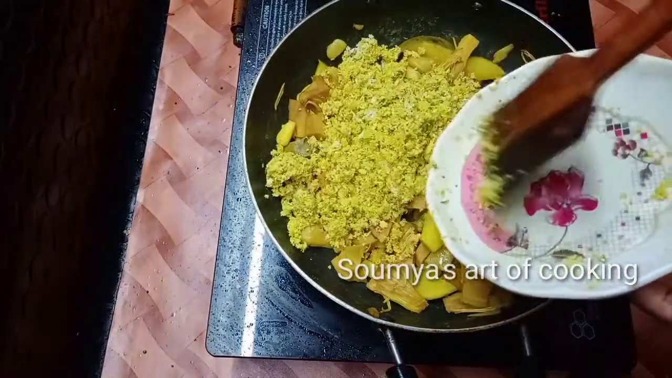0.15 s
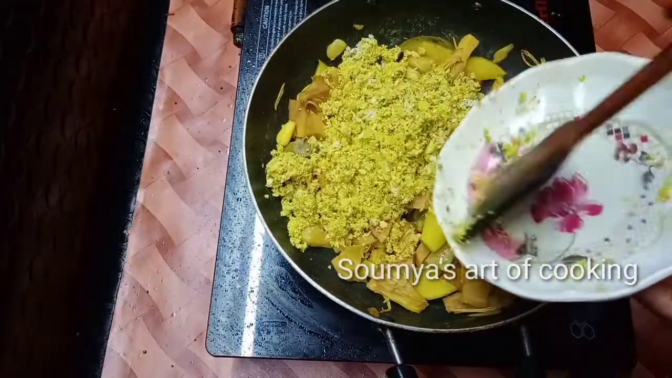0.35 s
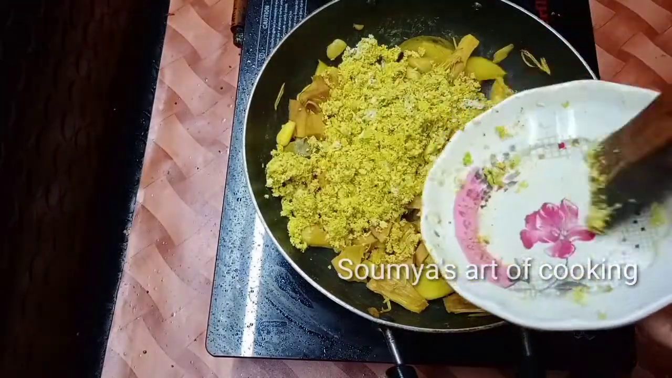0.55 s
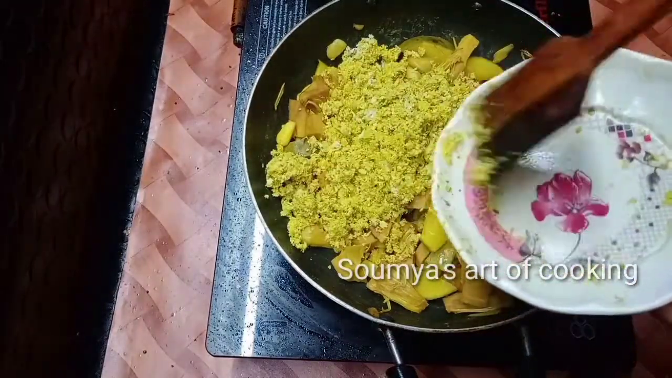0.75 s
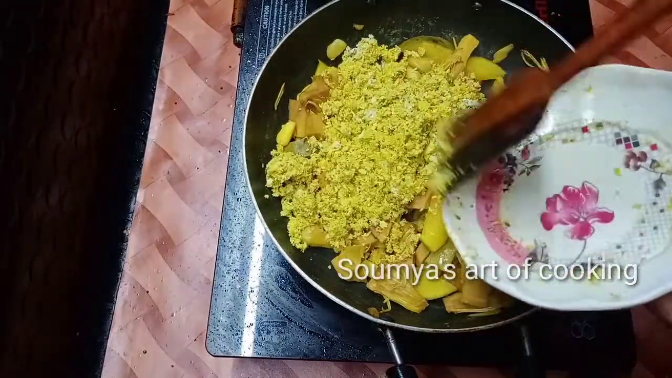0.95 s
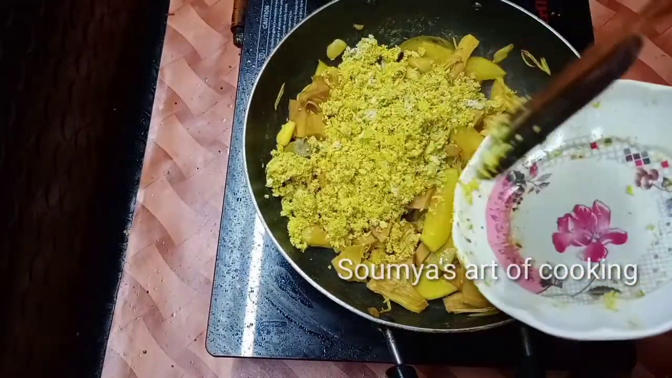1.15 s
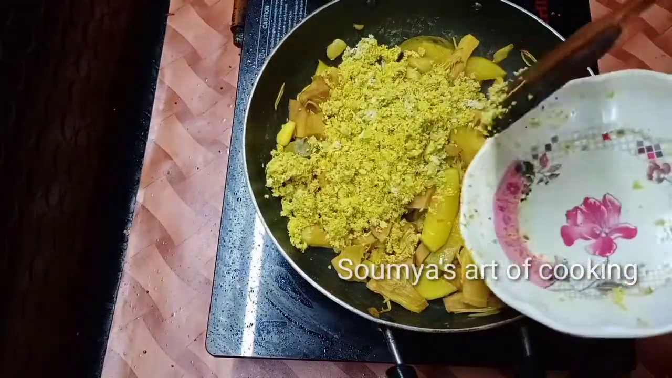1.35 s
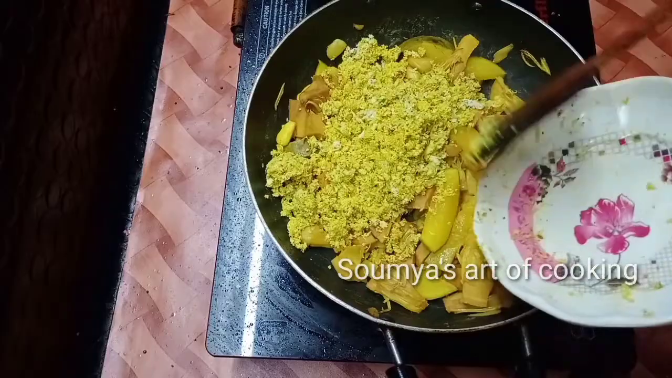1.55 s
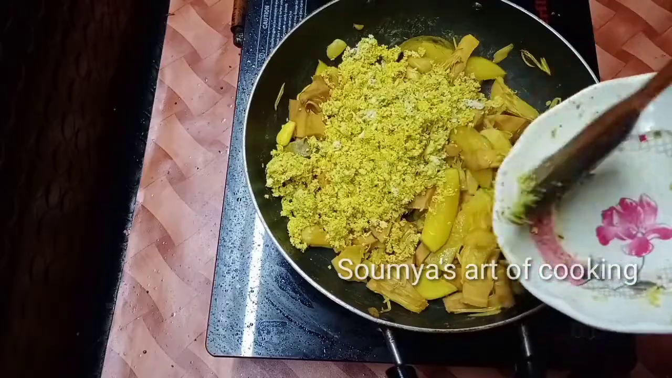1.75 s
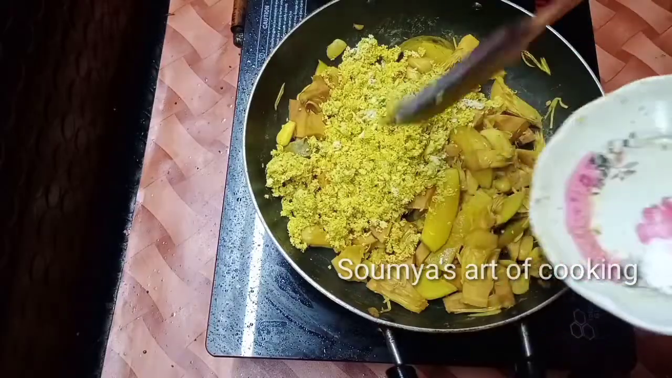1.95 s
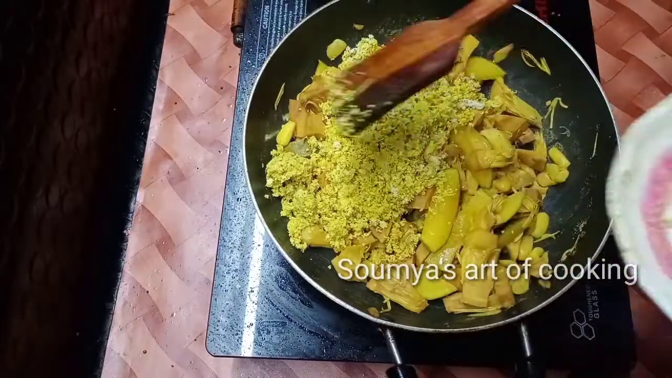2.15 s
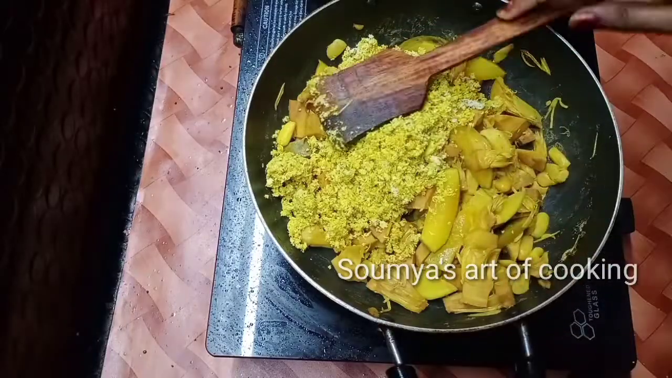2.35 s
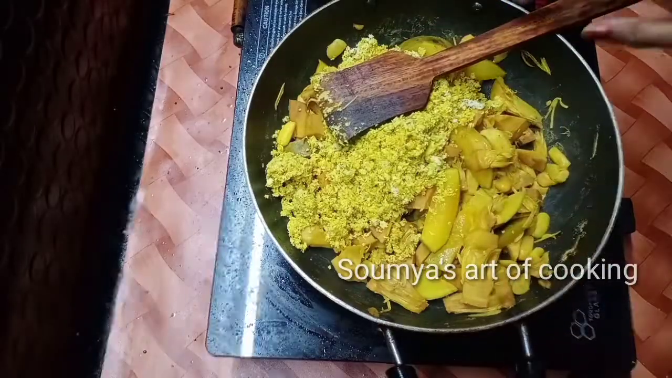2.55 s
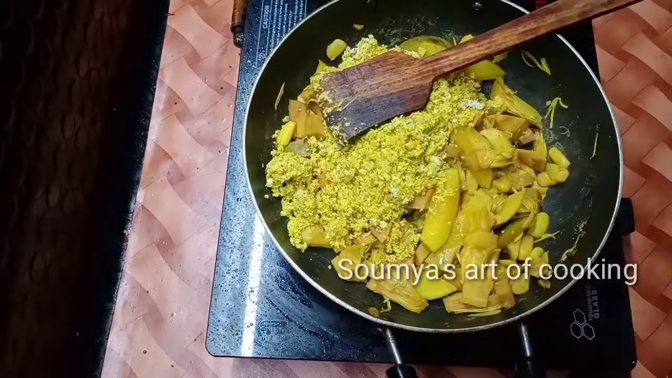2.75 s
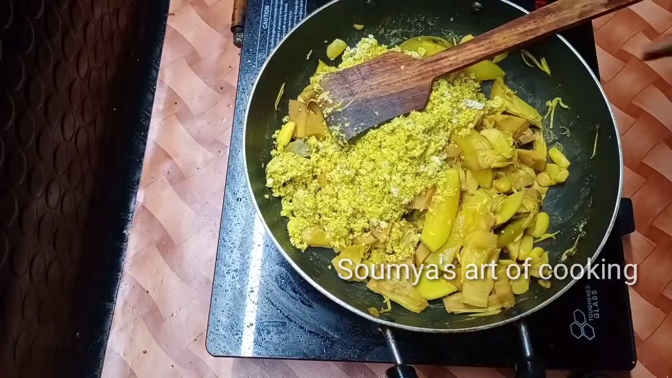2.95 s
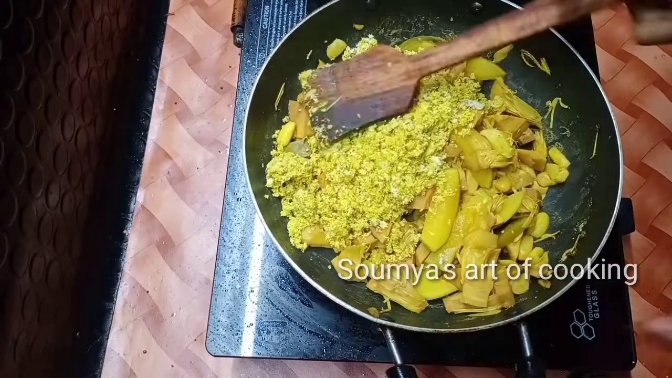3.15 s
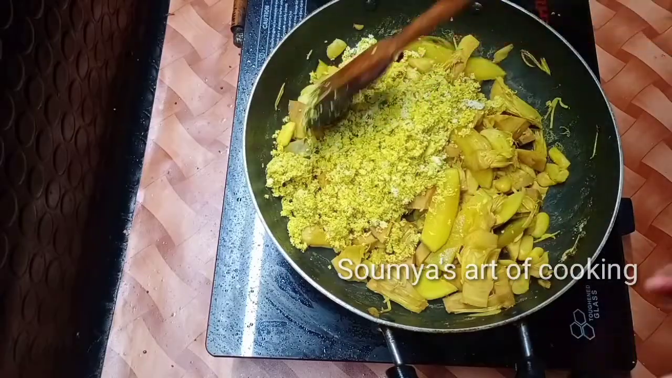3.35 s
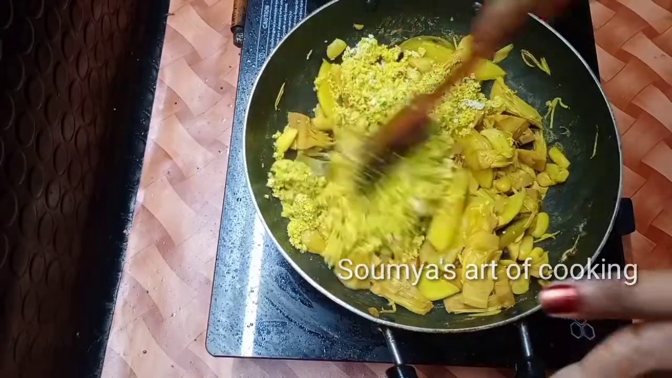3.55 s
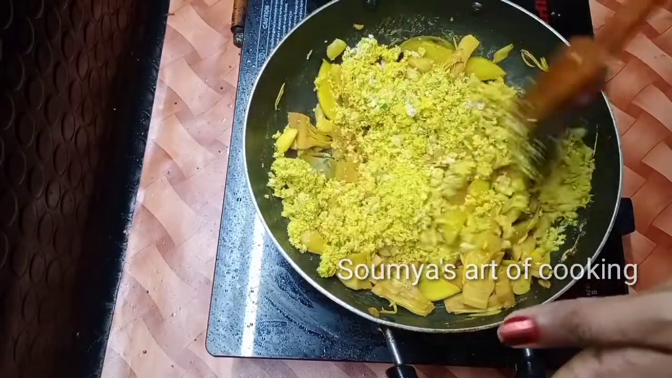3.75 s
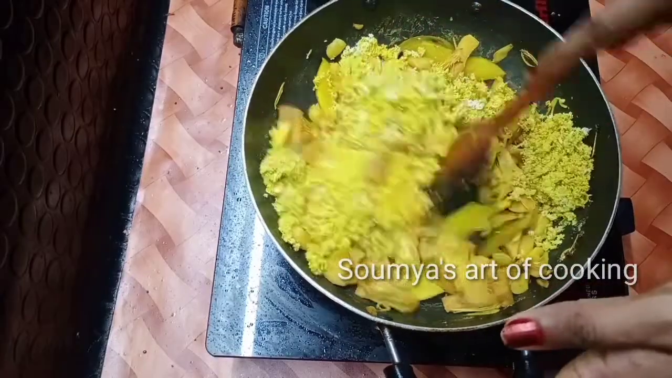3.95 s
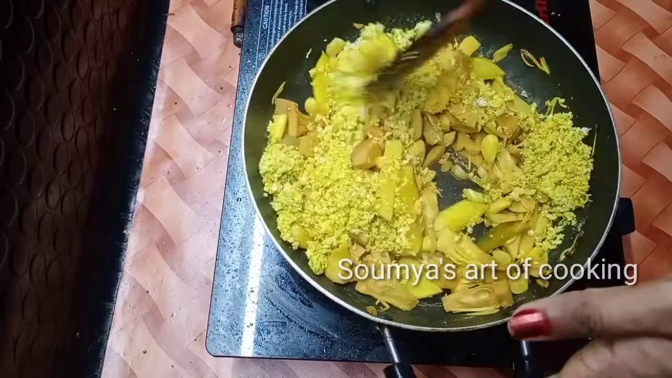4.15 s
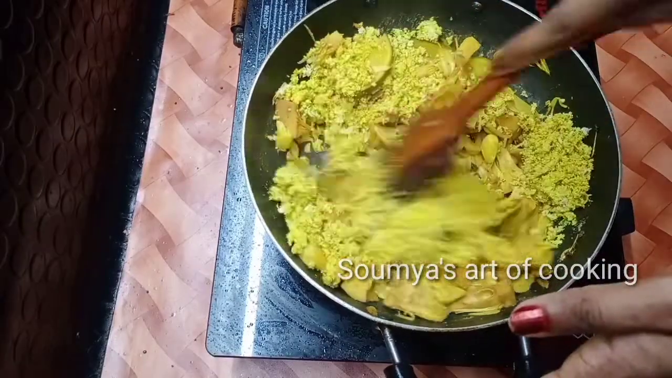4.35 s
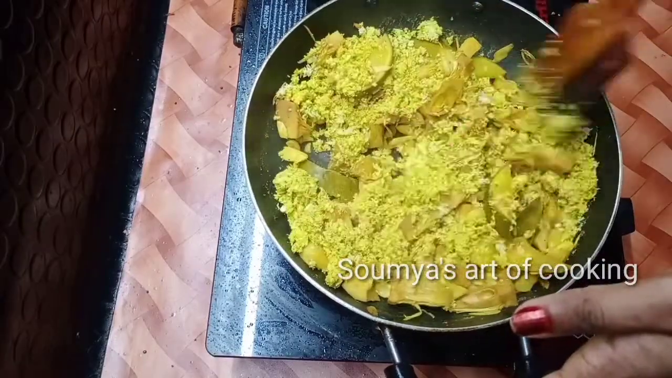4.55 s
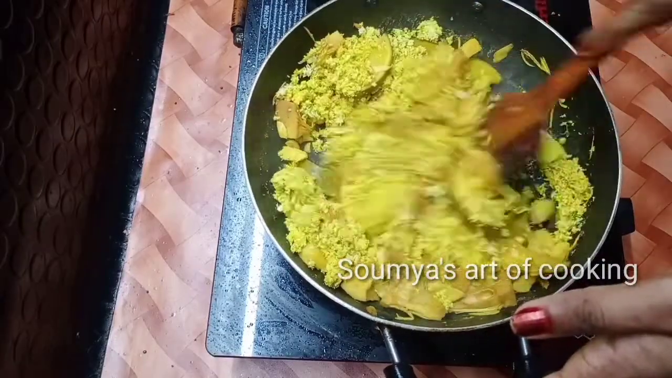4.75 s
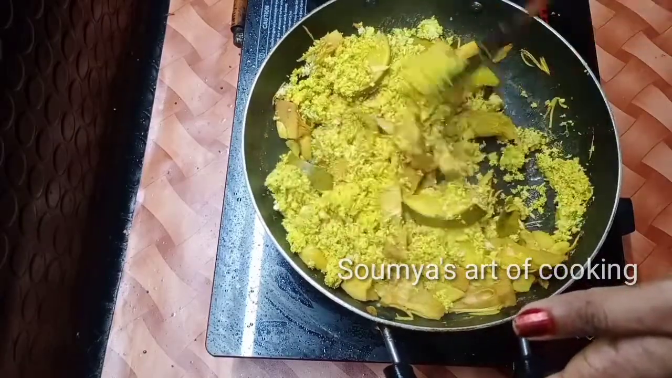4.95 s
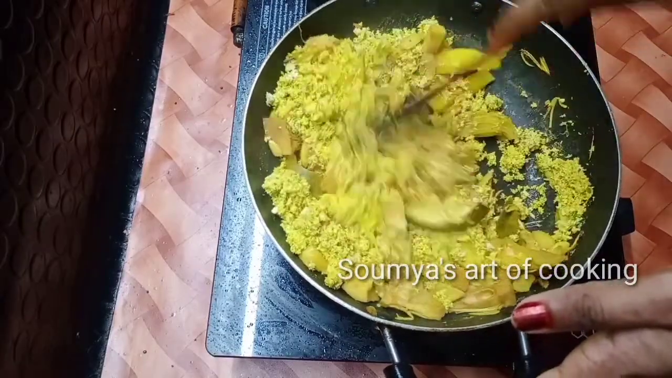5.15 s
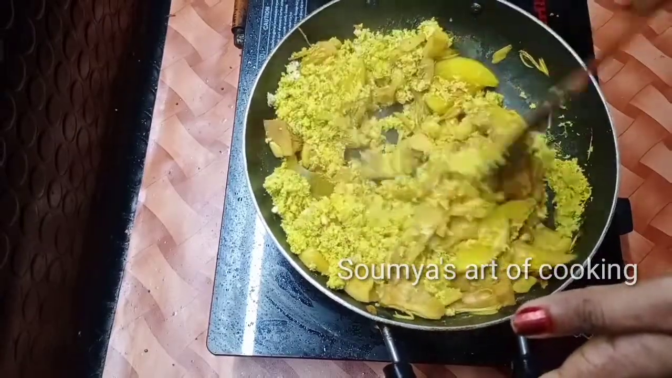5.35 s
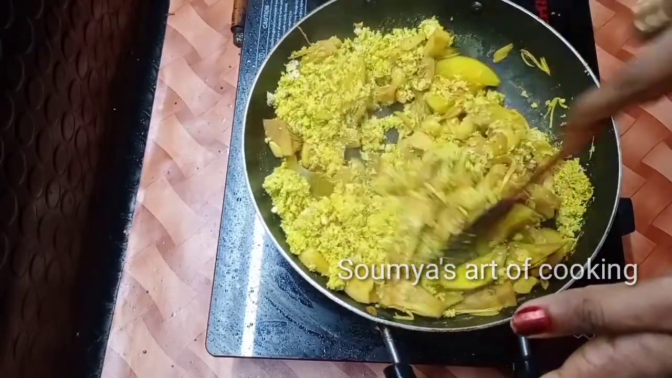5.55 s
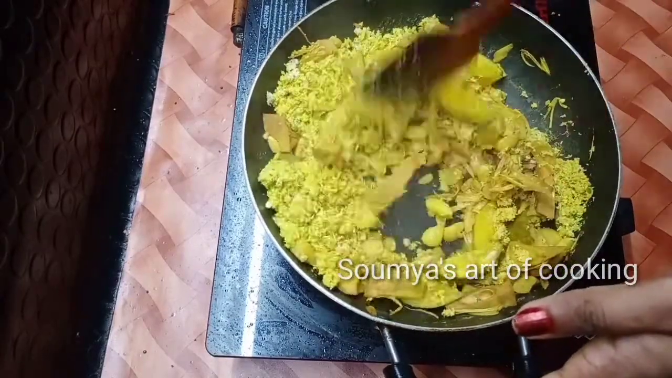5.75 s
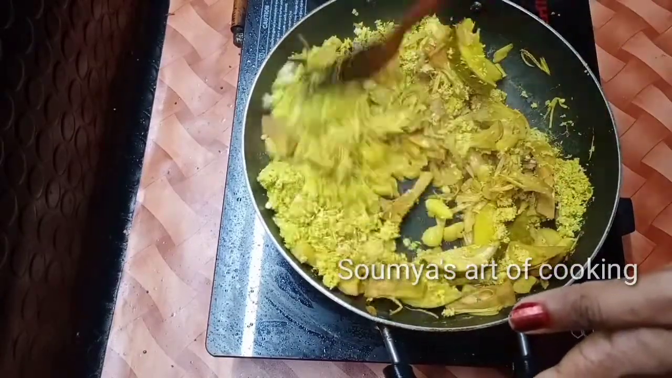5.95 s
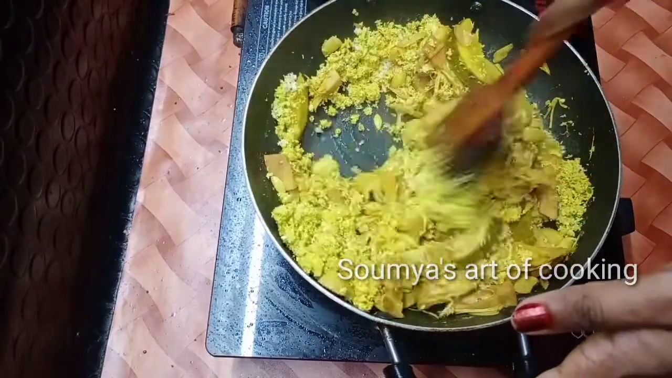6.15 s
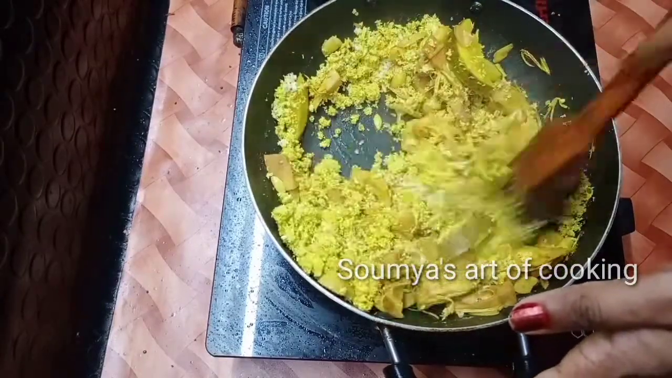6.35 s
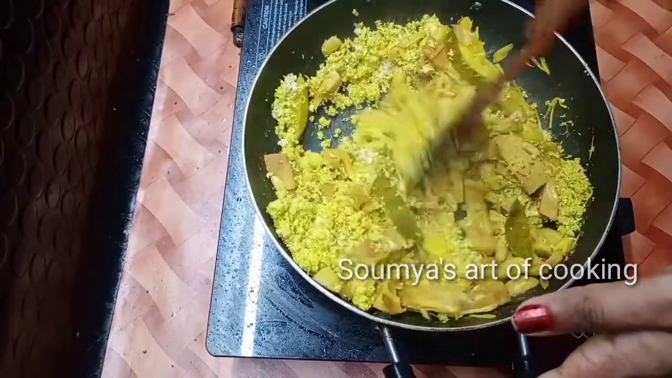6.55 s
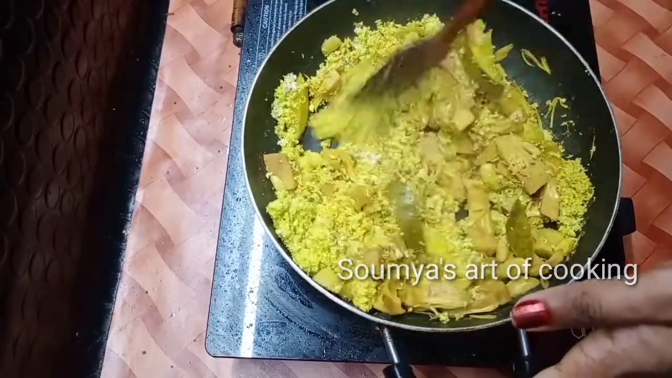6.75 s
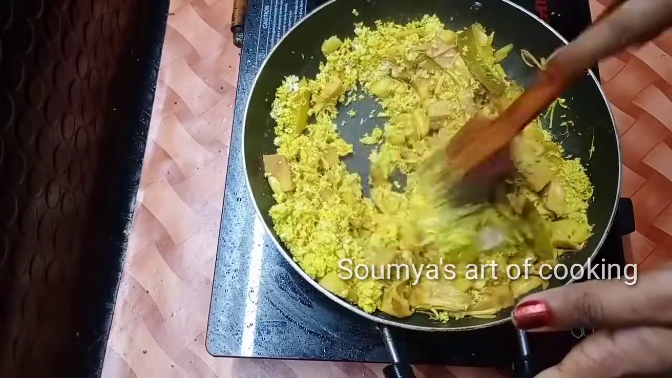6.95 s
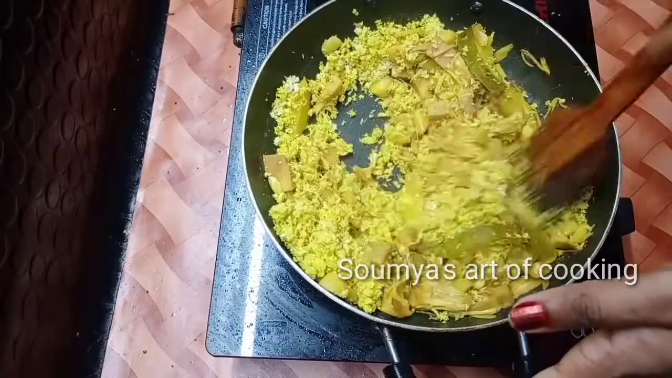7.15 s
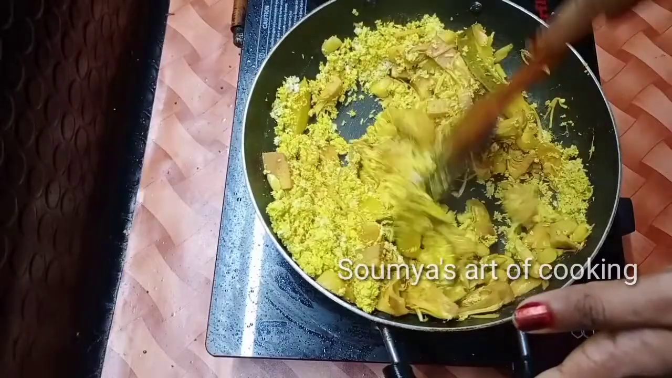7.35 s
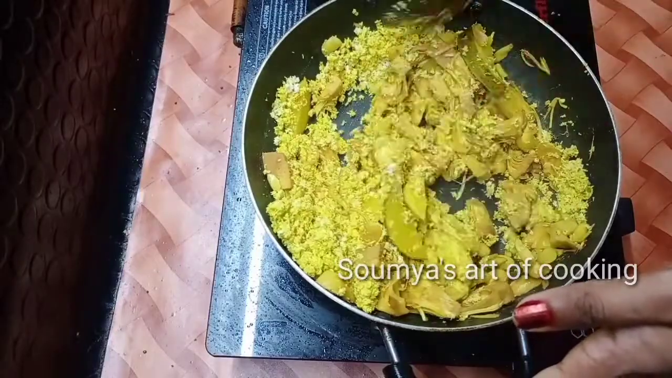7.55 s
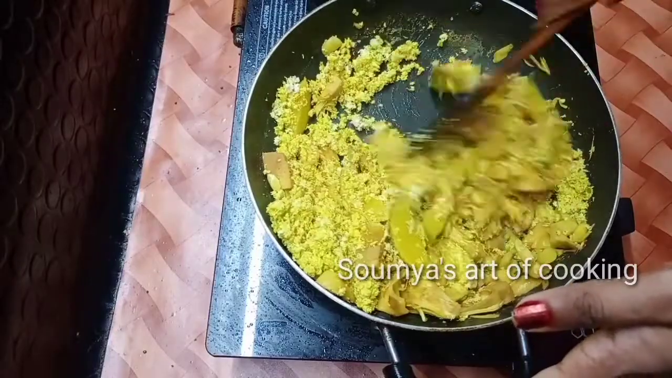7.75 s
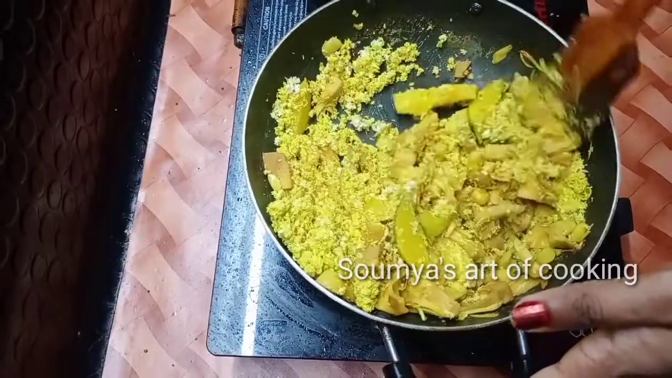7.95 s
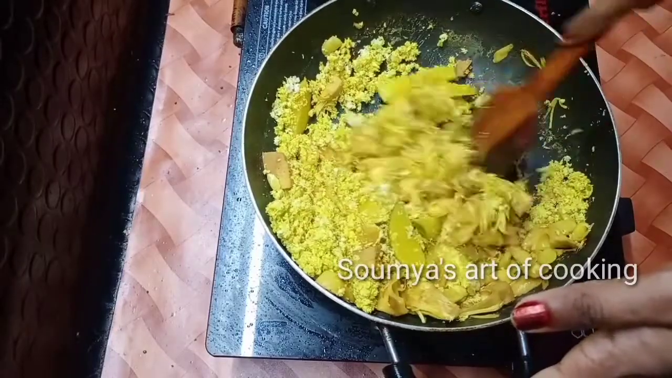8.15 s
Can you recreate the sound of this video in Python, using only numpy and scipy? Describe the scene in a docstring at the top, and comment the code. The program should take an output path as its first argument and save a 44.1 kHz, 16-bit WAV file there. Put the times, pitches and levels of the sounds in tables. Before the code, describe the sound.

Food sizzles in a pan throughout, a fine, bright hiss with wet crackle, over the very faint hum of a cooker fan. From the start until about 1.9 seconds, a wooden spatula knocks on a plate in a quick, uneven run, each hit a woody clack with a short ring, with brief scrapes near 0.4, 1 and 1.4 seconds. Two softer knocks at about 2.6 seconds mark the plate being put down. From 3 seconds the spatula works in the pan, with irregular ticks, thuds and short gritty scrapes that set the pan ringing dully. The strongest knocks land near 4, 4.7 and 5.7 seconds. The sizzle flares briefly with the strokes and sinks somewhat after 6 seconds, while lighter knocks and scrapes continue to about 8 seconds. Everything sounds close, with the short echo of a small kitchen.

```python
"""Woody knocks and scrapes on a plate over a steady sizzle, then stirring in a ringing pan.
A wooden spatula pushes food off the plate into the pan: each blow is a thud, a knock and a bright tick
that set plate or pan ringing, with the echo of a small kitchen. Tiny bursts of steam make the sizzle;
the cooker's fan hums faintly. Two close microphones share the sound unevenly; a limiter holds the peaks."""
import sys
import numpy as np
from scipy import signal
from scipy.fft import rfft, irfft, next_fast_len
from scipy.io import wavfile

SR = 44100
rng = np.random.default_rng(int(sys.argv[2]) if len(sys.argv) > 2 else 0)


def int16_out(signal):
    """Quantize to a 16-bit WAV file."""
    q = np.round(np.clip(np.atleast_2d(signal).T, -1, 1) * 32767)
    wavfile.write(sys.argv[1], SR, q.astype(np.int16))


N = 361279
FFT_SIZE = next_fast_len(N + SR // 2)
HZ = np.maximum(np.arange(FFT_SIZE // 2 + 1) * SR / FFT_SIZE, 1)
TIME = np.arange(N) / SR

# Spatula hits on the plate; the last two are the plate being put down. Each row: start in seconds,
# knock level in dB, its pitch in Hz, its t60 in seconds, thud level in dB, its pitch in Hz,
# then tick, snap and shudder in dB. Levels are relative within a column.
PLATE_HITS = [(0.055, -14, 748, 0.061, -40.5, 393, -27.5, -34.5, -34),
              (0.108, -17.5, 654, 0.0084, -21, 431, -29.5, -28, -37),
              (0.161, -37, 676, 0.044, -48, 425, -31, -31.5, -64.5),
              (0.348, -11.5, 1295, 0.086, -26, 187, -42, -39.5, -32),
              (0.451, -12, 1100, 0.022, -31, 417, -23.5, -35, -30),
              (0.662, -7.5, 810, 0.014, -14.5, 433, -14, -22, -28),
              (0.713, -16.5, 670, 0.008, -19.5, 490, -29.5, -40.5, -34.5),
              (0.741, -15, 677, 0.022, -21, 428.4, -25.5, -26.5, -35),
              (0.758, -37, 710, .022, -28.5, 427, -37, -43, -63.5),
              (0.972, -10.5, 748, 0.12, -31, 431, -26, -44.5, -27),
              (1.015, -13, 690, 0.012, -17.5, 495, -21, -35.5, -26.5),
              (1.367, -6.5, 1066, 0.013, -20, 437.4, -14, -21, -28.5),
              (1.619, -10, 680, 0.0092, -19.5, 495, -26, -29, -27.5),
              (1.886, -3, 1015, 0.0061, -15.5, 495, -18.5, -42.5, -29.5),
              (2.578, -25.5, 1900, 0.049, -28, 314.2, -31.5, -46.5, -44.5),
              (2.682, -33, 1540, 0.035, -25, 121.6, -26, -28, -52.5)]
# Spatula hits on the pan, with the same columns.
PAN_HITS = [(3.054, -25.5, 676, .048, -20.5, 210, -13.5, -14, -54.5),
            (3.099, -51, 651, .017, -82, 403, -36.5, -31.5, -68),
            (3.484, -42.5, 958, 0.051, -37, 204, -28.5, -24, -44),
            (3.534, -34.5, 1620, 0.012, -37.5, 480, -33.5, -36, -45.5),
            (3.564, -33.5, 995, 0.026, -32, 125, -17, -8.5, -47.5),
            (3.686, -59, 1440, 0.026, -37, 124, -43.5, -33, -62.5),
            (4.003, -26.5, 980, 0.016, -37, 187, -40.5, -46, -22),
            (4.027, -10.5, 1553, .016, -17.5, 285, -19, -33, -22.5),
            (4.716, -16.5, 1187, 0.02, -27.5, 403, -17.5, -8.5, -15),
            (4.826, -19.5, 603, .0058, -25.5, 125, -43.5, -51, -26.5),
            (4.852, -15, 1520, 0.015, -17, 414, -31.5, -35.5, -27),
            (5.662, -10, 1510, 0.047, -10, 516, -33.5, -29.5, -12),
            (5.677, -13, 1016, 0.027, -6.5, 369, -20.5, -22.5, -25.5),
            (6.04, -22, 773, 0.031, -13.5, 400, -55, -30.5, -22.5),
            (6.576, -18.5, 1550, 0.011, -18.5, 437, -39, -49, -27.5),
            (6.87, -18, 947, 0.042, -16.5, 473, -47.5, -31, -19),
            (7.273, -33, 1466, 0.058, -31.5, 500, -63, -32.5, -35),
            (7.394, -27.5, 1486, .027, -22.5, 445, -54.5, -40.5, -29),
            (7.674, -63, 700, 0.017, -29.5, 456, -55.5, -47, -41.5),
            (8.131, -28, 1520, 0.049, -36.5, 137.5, -38.5, -34, -29.5)]
# Short, quickly dying resonances of blade, plate and pan.
# Each row: pitch in Hz, relative level in dB, t60 in seconds.
BLADE_TONES = [(2340, -7, 0.0037), (2712, -9.5, 0.024), (3100, -18, 0.0069), (3782, 6.5, 0.0031),
               (4330, -2, 0.019), (4900, -9, 0.022), (5670, -14, 0.042)]
PLATE_TONES = [(130, -16.5, 0.048), (210, -15.5, 0.02), (296, -6, 0.025), (431, 2.5, 0.017),
               (497.5, -3, 0.05), (676, -1, 0.037), (748, -9, 0.085), (830, -6.5, 0.013),
               (1090.4, 2, 0.038), (1180, 1.5, 0.027), (1300, 7.5, 0.0088), (1510, 4.5, 0.017),
               (2370, -14, 0.056), (3880, -32, .02)]
PAN_TONES = [(123, -11.5, 0.1), (158, -21, 0.42), (210, -14.5, 0.02), (294.5, -6, 0.089), (352, -10, 0.25),
             (438.7, -3.5, 0.15), (495, -9, 0.046), (595, -12, 0.025), (697, -17.5, 0.049),
             (792, -13.5, 0.056), (895, -11.5, 0.016), (1023, -13, 0.029), (1131, -16.5, 0.03),
             (1520, -16.5, 0.026), (2580, -19.5, 0.017), (3870, -22.5, 0.0052)]
# The blade dragging over plate and pan. Each row: moment of full force, rise, hold and fall in seconds,
# then drag and grit as relative levels in dB.
PLATE_SCRAPES = [(0.382, 0.029, 0.015, 0.33, -39.5, -49), (1.035, 0.0045, 0.01, 0.031, -40, -51.5),
                 (1.44, 0.067, 0.024, 0.071, -34.5, -51.5)]
PAN_SCRAPES = [(3.688, .1, 0.0075, .045, -60, -46), (4.022, 0.031, 0.0037, 0.0052, -22, -39),
               (4.42, 0.074, 0.12, 0.017, -74, -49.5), (4.76, .015, 0.12, .006, -40.5, -45.5),
               (5.657, 0.0047, 0.0025, 0.0027, -15.5, -39), (5.948, 0.036, 0.0028, .03, -48, -73.5),
               (6.49, 0.014, 0.096, .006, -39.5, -49.5), (7.272, 0.011, .005, 0.08, -37, -50),
               (7.72, 0.042, 0.037, 0.096, -33.5, -60), (8.138, 0.018, .005, 0.084, -36, -52)]
# The frying bed. Each row: time in seconds, hiss level in dB, wet crackle level in dB.
FRYING_LEVELS = [(0.0, -46.5, -52), (0.09, -48.5, -56), (2.07, -47, -54), (2.64, -45.5, -50.5),
                 (3.9, -46, -51.5), (4.2, -45.5, -54), (4.58, -47, -53), (6.52, -52.5, -62.5),
                 (6.91, -51, -63), (7.71, -51, -64), (7.87, -56.5, -67.5), (8.19, -55.5, -69)]
# Fresh food meets hot metal and the frying flares.
# Each row: moment of full lift, rise, hold and fall in seconds, then lift of the hiss in dB.
FRYING_FLARES = [(0.11, 0.039, 0.034, 0.13, 3.5), (0.47, 0.029, 0.052, 0.09, 1.5),
                 (1.698, 0.068, .05, 0.077, 1), (2.904, 0.22, 0.04, .2, 1),
                 (4.798, 0.084, 0.075, 0.22, 1.5), (5.295, 0.16, 0.033, 0.15, 2.5),
                 (5.688, 0.049, 0.04, 0.21, 3.5), (6.06, .04, 0.096, 0.45, 3), (6.495, 0.059, .08, 0.18, 2),
                 (6.873, .04, 0.047, 0.15, 5), (7.29, .04, 0.043, 0.11, 2), (7.7, 0.04, 0.15, .08, 6),
                 (8.15, .04, 0.11, .1, 6.5)]
# The frying makes the pan ring now and then.
# Each row: moment of full level, rise, hold and fall in seconds, then level in dB.
PAN_SWELLS = [(2.6, 0.56, .2, 0.73, -58), (3.65, 0.3, .05, .2, -56), (3.95, 0.13, .04, 0.076, -60.5),
              (4.5, 0.13, .05, 0.085, -62), (5.3, 0.17, .05, 0.095, -65), (6.2, 0.11, .08, .1, -70),
              (7.797, .08, 0.055, 0.081, -56)]
# Tone colours of ticks and grit, of steam bursts and of the fan.
# Each row: frequency in Hz, relative level in dB.
GRIT_EQ = [(900, -23.5), (1800, -9.5), (2500, -14.5), (3000, -13), (4000, -6), (5200, -22.5), (7000, -6.5),
           (10000, -29.5), (16000, -28)]
SIZZLE_EQ = [(530, -65), (900, -20), (1250, -31), (1390, -6), (1550, -8.5), (1990, -35.5), (2330, -15),
             (2540, -17), (3190, -14.5), (3680, -9.5), (5040, -9.5), (7310, 3), (9650, -15.5), (14900, -16),
             (16000, -19.5)]
FAN_EQ = [(20, -5), (40, -21), (70, -22.5), (90, -8.5), (104, 7), (120, -14.5), (140, -13), (400, -21),
          (900, -20.5), (1400, -19.5), (2200, -22.5)]
# The kitchen's decay. Each row: frequency in Hz, t60 in seconds.
ROOM_DECAY = [(100, 0.29), (400, 0.25), (1200, 0.1), (3000, 0.39), (8000, 0.35)]
# Stereo image of sizzle and fan. Each row: frequency in Hz, left-right likeness from 0 to 1.
STEREO_LIKENESS = [(60, 0.58), (99, 0.95), (160, 0.96), (270, 0.93), (450, 0.19), (740, 0.78), (1220, 0.98),
                   (2010, 0.3), (3330, 0.98), (5500, 0.94), (9080, 0.92), (15000, 0.27)]
# Balance of the microphones. Each row: frequency in Hz, level of left over right in dB.
MIC_BALANCE = [(60, 11), (92, 1), (140, 5.5), (210, 4), (330, 4.5), (500, 4), (770, 5.0), (1170, 8),
               (1790, 4.5), (2740, 2.5), (4190, 5.5), (6410, 0), (9810, -15.5), (15000, 3)]
# Crossovers in Hz between the frying's pan ring, crackle, hiss and spray.
SIZZLE_CROSSOVERS = [1900, 5500, 9500]

BOOM_HZ, BOOM_RISE_S, BOOM_LAG_S, BOOM_UNDER_THUD_DB = 132, 0.0016, 0.016, 19
CLACK_DB, TICK_NOISE_DB, SNAP_NOISE_DB = -4.5, 14, 16.5   # drive on top of a hit's tick or snap level
THUD_FLOOR_HZ = 90   # a small pan and plate radiate little below this
KNOCK_TOP_HZ = 1700   # a low-pass keeps knocks and thuds dull
EDGE_DB, GRIT_EDGE_DB = 22.5, 8.5   # fade over one rise or fall time
SPRAY_UNDER_DB, SPRAY_FOLLOWS_CRACKLE = 5.5, 0.55   # fine spray sits under a blend of hiss and crackle
CRACKLE_FLARE, SPRAY_FLARE = 2.4, 1.4   # dB of lift for each dB in the hiss
PAN_RING_FLOOR_DB, FAN_DB = -76.5, -68
KITCHEN_DB, FIRST_ECHO_S = -12.5, 0.0025
BASS_CUT_HZ, TOP_CUT_HZ = 95, 15900
THRESHOLD_DB, OVERSHOOT_DECAY_DB_S, DUCK_SHARE = -5, 77, 0.6


def spatula_hits(hits):
    """Wood lands: a knock, a thud, the blade's clack, a gritty snap; the worktop booms just after."""
    length = 8000
    t = np.arange(length) / SR
    lows, clacks, ticks, snaps = np.zeros((4, N + length))
    noises = rng.standard_normal((len(hits), 2, length))
    spots = np.clip(rng.standard_normal((len(hits), len(BLADE_TONES))), -1.5, 1.5)
    boom_age = np.maximum(t - BOOM_LAG_S, 0) / BOOM_RISE_S
    boom_swell = boom_age * np.exp(1 - boom_age)
    attack = 1 - np.exp(-t / .0004)   # wood yields a little: contact takes a moment
    slap = 1 + 3.3 * np.exp(-t / 0.0012)   # the first swing stands out
    for hit, noise, spot in zip(hits, noises, spots):
        start, knock_db, knock_hz, knock_t60, thud_db, thud_hz, tick_db, snap_db, _ = hit
        at = slice(round(start * SR), round(start * SR) + length)
        knock = from_db(knock_db - 60 * t / knock_t60) * np.cos(2 * np.pi * knock_hz * t)
        thud_t60 = .03 + 4.2 / thud_hz
        thud = from_db(thud_db - 60 * t / thud_t60) * np.sin(2 * np.pi * thud_hz * t)
        boom_hz = BOOM_HZ * (1 + 0.11 * spot[0])
        boom = from_db(thud_db - BOOM_UNDER_THUD_DB) * boom_swell * np.sin(2 * np.pi * boom_hz * t)
        lows[at] += boom - knock * attack * slap - thud
        for (hz, tone_db, t60), luck in zip(BLADE_TONES, spot):
            clack_db = tick_db + CLACK_DB + tone_db + 7.9 * luck
            clacks[at] += from_db(clack_db - 60 * t / t60) * np.sin(2 * np.pi * hz * t)
        ticks[at] += from_db(tick_db + TICK_NOISE_DB - 60 * t / 0.032) * noise[0]
        snaps[at] += from_db(snap_db + SNAP_NOISE_DB - 60 * t / 0.019) * noise[1]
    knock_band = signal.butter(2, [THUD_FLOOR_HZ, KNOCK_TOP_HZ], "band", fs=SR, output="sos")
    colour = from_db(at_hz(GRIT_EQ, HZ))
    bright = clacks[:N] + eq(ticks[:N], colour * (HZ < 6000)) + eq(snaps[:N], colour * (HZ >= 6000))
    bite = np.roll(bright, SR // 1500)   # the hard edge bites just after first touch
    return signal.sosfilt(knock_band, lows)[:N] + bite


def dish_ring(hits, drag, tones, shudder_t60, drag_db, strike_db, db_per_octave):
    """Plate or pan rings: struck, shaken by the dying shudder of each hit, and rubbed by the blade."""
    t, out = np.arange(20000) / SR, np.zeros(N)
    slips = grains(1200, spread_db=3) * from_db(2.5 * drift(35))   # the blade grips unevenly
    shudder = rng.standard_normal(N + len(t))
    spots_db = 2.5 * rng.standard_normal((len(hits), len(tones)))   # each spot favours other tones
    fade = from_db(-60 * t / shudder_t60)
    for k, (hz, tone_db, t60) in enumerate(tones):
        unity = np.sqrt(4 * np.log(1000) / (t60 * SR))   # steady shaking of rms 1 rings at rms 1
        shake = np.pad(from_db(drag_db) * unity * drag * slips, (0, len(t)))
        for (start, _, knock_hz, *_, shudder_db), spot_db in zip(hits, spots_db[:, k]):
            at = round(start * SR)
            octaves_off = abs(np.log2(hz / knock_hz))   # tones near the knock answer most
            gain = from_db(shudder_db - db_per_octave * octaves_off + spot_db)
            shake[at:at + len(t)] += gain * unity * fade * shudder[at:at + len(t)]
            shake[at] += gain * from_db(strike_db)
        out += (-1) ** k * from_db(tone_db) * resonator(shake[:N], hz, t60)
    return out


def scrape_envelopes(scrapes):
    """The blade leans in, holds and lets go: one envelope for its drag, one for its grit."""
    drag, grit = np.zeros((2, N))
    for *shape, drag_db, grit_db in scrapes:
        away = outside_hold(*shape)
        drag += from_db(drag_db - EDGE_DB * away)
        grit += from_db(grit_db - GRIT_EDGE_DB * away)
    return drag, grit


def scrape_grit(envelope):
    """The dragging blade sheds a rough stream of tiny, bright clicks."""
    clicks = grains(2800, spread_db=4.5) * from_db(2.2 * drift(25))
    return envelope * unit_rms(eq(clicks, from_db(at_hz(GRIT_EQ, HZ))))


def sizzle():
    """Thousands of tiny steam bursts a second; pan ring, crackle, hiss and spray swell on their own."""
    times, *levels = np.transpose(FRYING_LEVELS)
    hiss_db, crackle_db = [np.interp(TIME, times, level) for level in levels]
    spray_db = hiss_db + SPRAY_FOLLOWS_CRACKLE * (crackle_db - hiss_db) - SPRAY_UNDER_DB
    flare_db = sum(db * np.maximum(1 - outside_hold(*shape), 0) for *shape, db in FRYING_FLARES)
    swells = sum(from_db(db - EDGE_DB * outside_hold(*shape)) for *shape, db in PAN_SWELLS)
    bursts = widen(*[grains(9000, spread_db=2.5) for _ in range(3)])
    colour = from_db(at_hz(SIZZLE_EQ, HZ)) * (HZ > 700)
    band = np.searchsorted(SIZZLE_CROSSOVERS, HZ)
    envelopes = [(from_db(PAN_RING_FLOOR_DB) + swells) * from_db(4 * drift(8)),   # the pan rings in fits
                 from_db(crackle_db + CRACKLE_FLARE * flare_db),
                 from_db(hiss_db + flare_db),
                 from_db(spray_db + SPRAY_FLARE * flare_db)]
    return sum(envelope * from_db(1.3 * drift(17)) * unit_rms(eq(bursts, colour * (band == k)))
               for k, envelope in enumerate(envelopes))


def cooker_fan():
    """A wavering hum over a dull rush of air."""
    air = widen(*rng.standard_normal((3, N)))
    colour = from_db(at_hz(FAN_EQ, HZ)) * (HZ < 2200)
    return from_db(FAN_DB) * unit_rms(eq(air, colour))


def kitchen_echo(x):
    """A small room's dense echoes, each octave dying at its own pace."""
    t, tail = np.arange(SR // 2) / SR, 0
    edges_hz = 60 * 2. ** np.arange(9)
    for low, high in zip(edges_hz, edges_hz[1:]):
        octave = signal.butter(2, [low, high], "band", fs=SR, output="sos")
        t60 = at_hz(ROOM_DECAY, np.sqrt(low * high))
        tail = tail + signal.sosfilt(octave, rng.standard_normal(len(t))) * from_db(-60 * t / t60)
    tail *= t > FIRST_ECHO_S
    tail /= np.sqrt(np.sum(tail ** 2))
    return eq(x, from_db(KITCHEN_DB) * rfft(tail, FFT_SIZE))


def outside_hold(start, rise, hold, fall):
    """How many rise or fall times each sample lies outside the hold."""
    return np.maximum(np.maximum((start - TIME) / rise, (TIME - start - hold) / fall), 0)


def grains(per_s, spread_db):
    """Random clicks of uneven size, at rms 1."""
    sizes = from_db(spread_db * np.minimum(rng.exponential(1, N), 5)) * rng.choice([-1, 1], N)
    return unit_rms(sizes * (rng.random(N) < per_s / SR))


def drift(rate_hz):
    """A smooth random wobble with an rms near 1."""
    hop, run_in = 40, 2000
    pole = np.exp(-2 * np.pi * rate_hz * hop / SR)
    noise = rng.standard_normal(N // hop + run_in + 2)
    slow = signal.lfilter([1], [1, -2 * pole, pole * pole], noise)[run_in:]
    return np.interp(np.arange(N) / hop, np.arange(len(slow)), unit_rms(slow))


def resonator(clicks, hz, t60):
    """A unit click sets a sine of height 1 ringing."""
    radius, angle = from_db(-60 / (t60 * SR)), 2 * np.pi * hz / SR
    return signal.lfilter([0, np.sin(angle)], [1, -2 * radius * np.cos(angle), radius ** 2], clicks + 1e-18)


def widen(common, left, right):
    """Two channels that share only part of a wide source."""
    alike = np.clip(at_hz(STEREO_LIKENESS, HZ), 0, 1)
    return eq(common, np.sqrt(alike)) + eq(np.array([left, right]), np.sqrt(1 - alike))


def eq(x, gain):
    """Weigh every frequency of x by gain."""
    return irfft(rfft(x, FFT_SIZE) * gain, FFT_SIZE)[..., :N]


def at_hz(curve, hz):
    """Read a curve on a log-frequency axis."""
    points_hz, values = np.transpose(curve)
    return np.interp(np.log(hz), np.log(points_hz), values)


def from_db(db):
    """Gain of a level in dB."""
    return 10 ** (np.asarray(db) / 20)


def unit_rms(x):
    """Scale to rms 1."""
    return x / np.sqrt(np.mean(x ** 2) + 1e-20)


def scene():
    """Hits and grit up front with their echo, plate and pan ringing, frying and fan around them."""
    plate_drag, plate_grit = scrape_envelopes(PLATE_SCRAPES)
    pan_drag, pan_grit = scrape_envelopes(PAN_SCRAPES)
    spatula = scrape_grit(plate_grit + pan_grit) + spatula_hits(PLATE_HITS + PAN_HITS)
    plate = dish_ring(PLATE_HITS, plate_drag, PLATE_TONES,
                      shudder_t60=0.18, drag_db=-15.5, strike_db=10.5, db_per_octave=4.5)
    pan = dish_ring(PAN_HITS, pan_drag, PAN_TONES,
                    shudder_t60=0.23, drag_db=-5.5, strike_db=-8.5, db_per_octave=3.5)
    return spatula + kitchen_echo(spatula) + plate + pan + sizzle() + cooker_fan()


def record(dry):
    """Small, uneven microphones, a limiter that ducks everything after a loud peak, a steep top cut."""
    x = signal.sosfilt(signal.butter(2, BASS_CUT_HZ, "high", fs=SR, output="sos"), dry)
    balance = from_db(at_hz(MIC_BALANCE, HZ))
    right_gain = 2 / (1 + balance)
    x = eq(x, np.array([balance * right_gain, right_gain]))
    over_db = np.maximum(20 * np.log10(np.abs(x).max(axis=0) + 1e-9) - THRESHOLD_DB, 0)
    decay_db = OVERSHOOT_DECAY_DB_S * TIME
    held_db = np.maximum.accumulate(over_db + decay_db) - decay_db
    duck_db = DUCK_SHARE * signal.lfilter([.01], [1, -.99], held_db)   # attack of about 2 ms
    top_cut = signal.cheby2(12, 50, TOP_CUT_HZ, fs=SR, output="sos")
    return signal.sosfilt(top_cut, np.clip(x * from_db(-duck_db), -1, 1))


dry = scene()
out = record(dry)
int16_out(out)
```